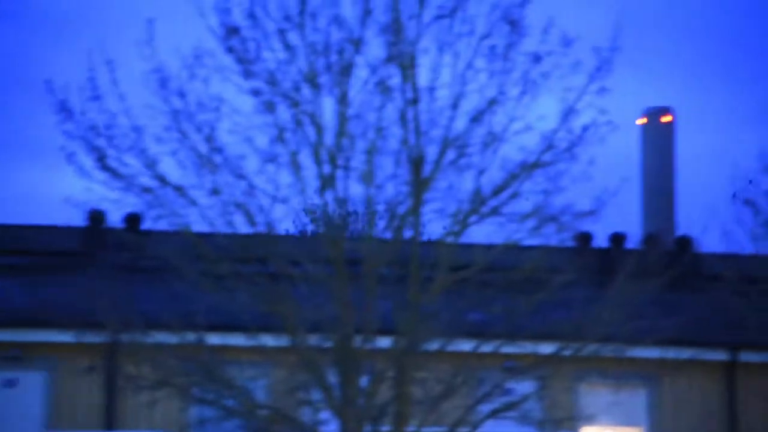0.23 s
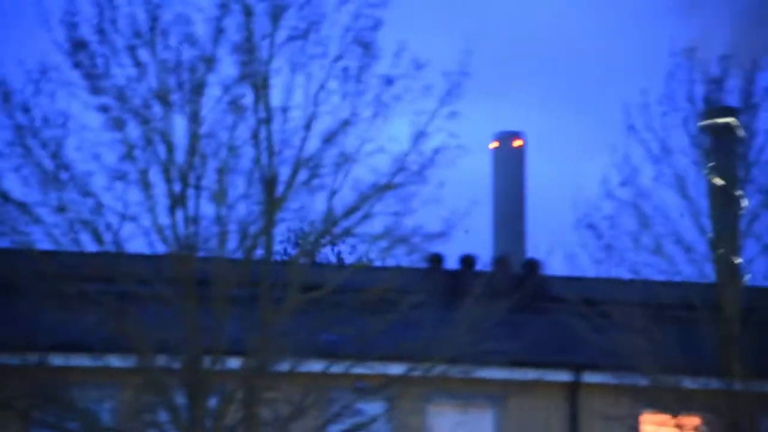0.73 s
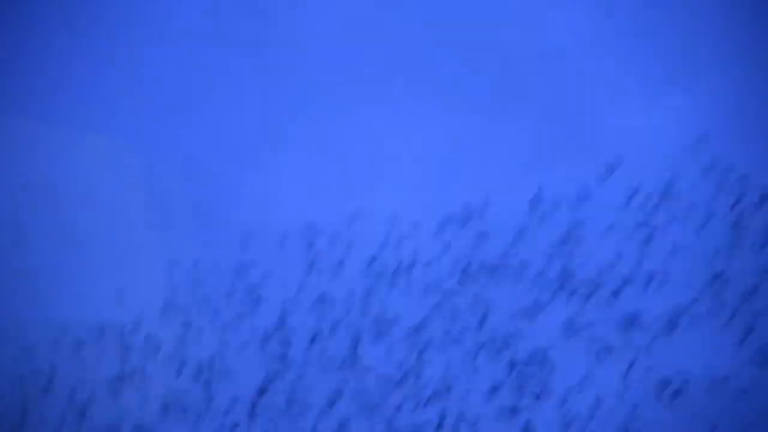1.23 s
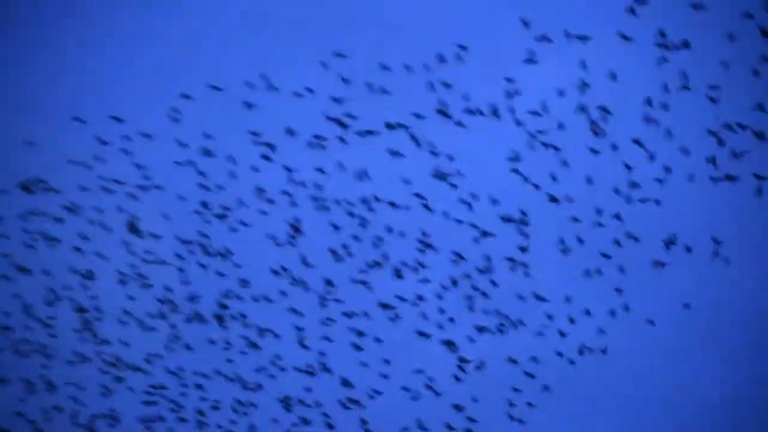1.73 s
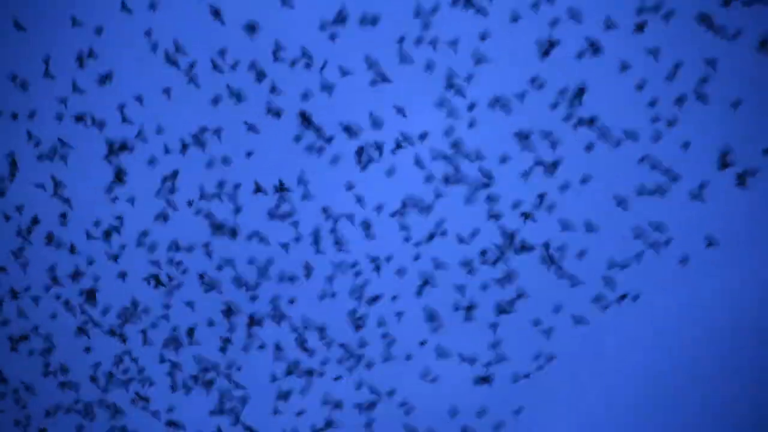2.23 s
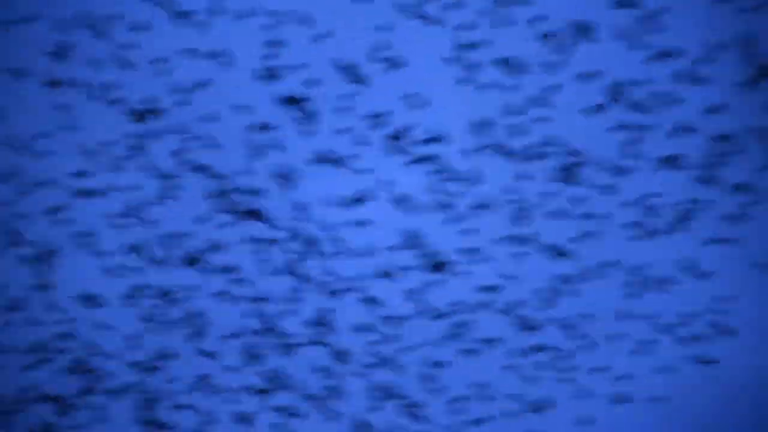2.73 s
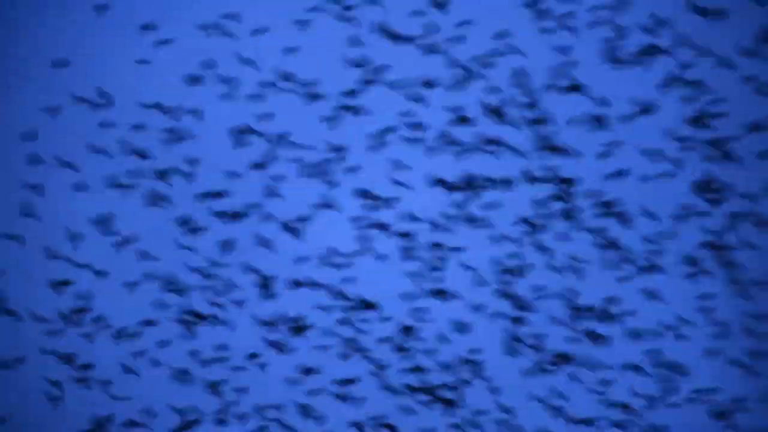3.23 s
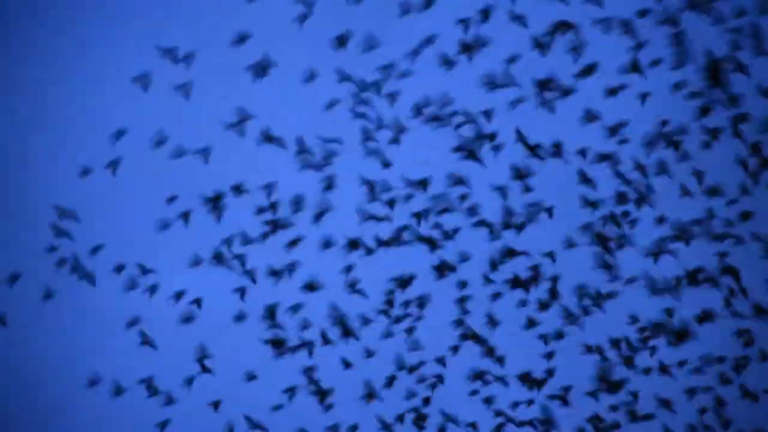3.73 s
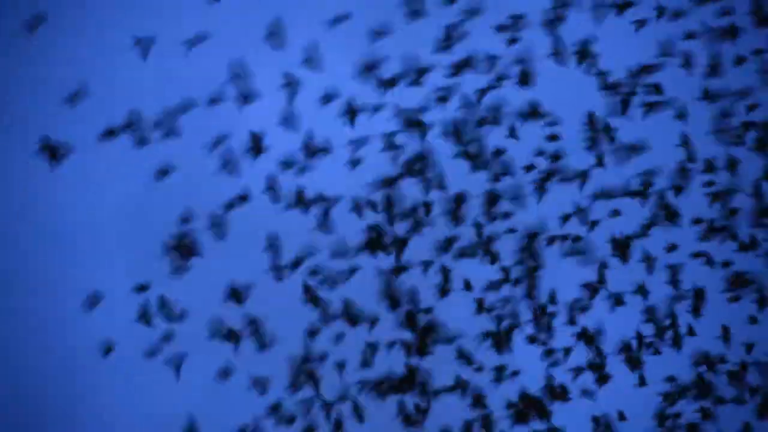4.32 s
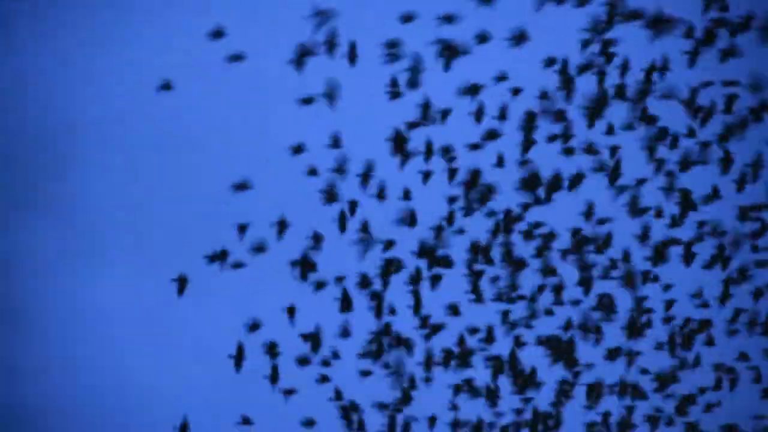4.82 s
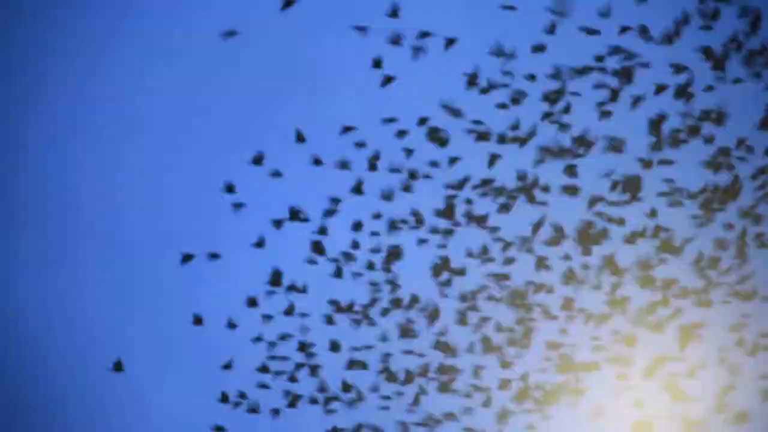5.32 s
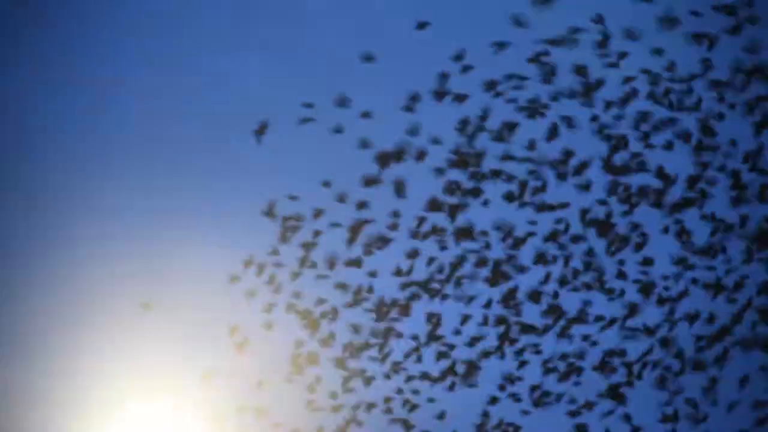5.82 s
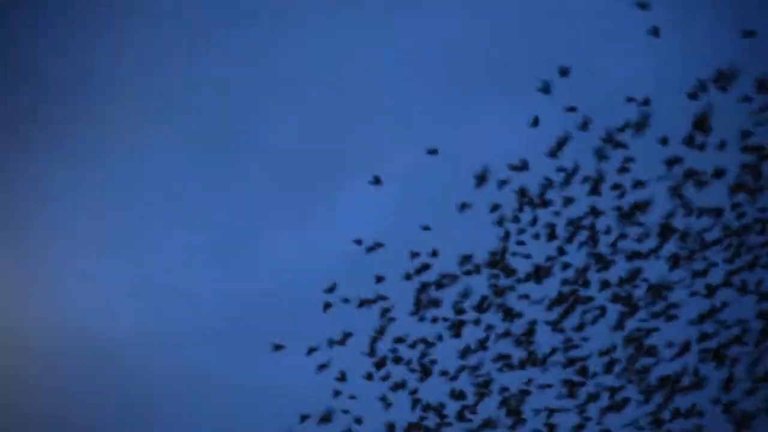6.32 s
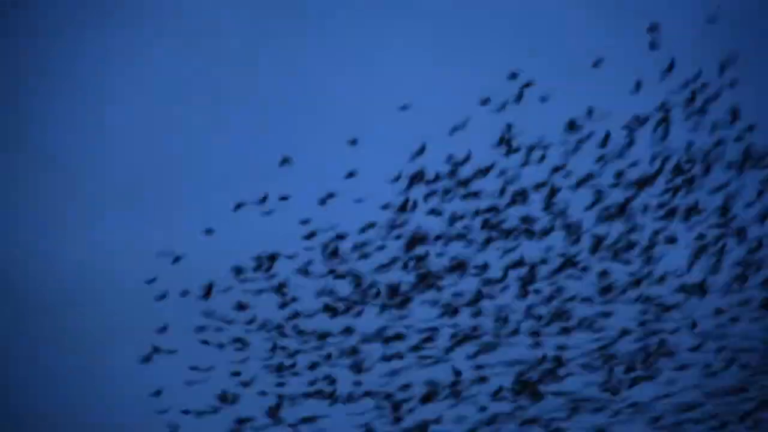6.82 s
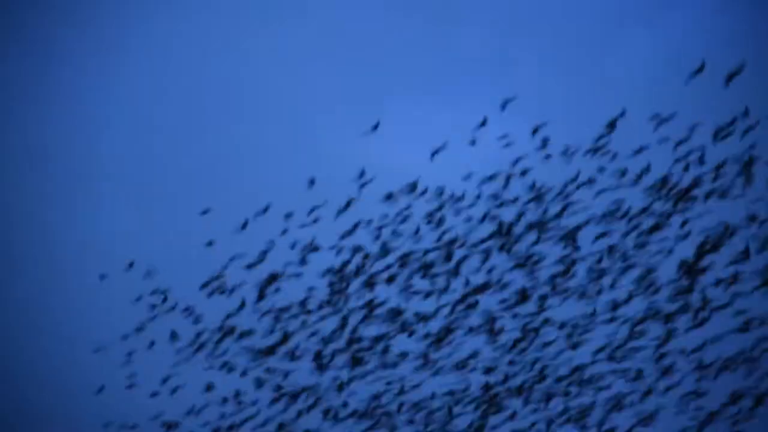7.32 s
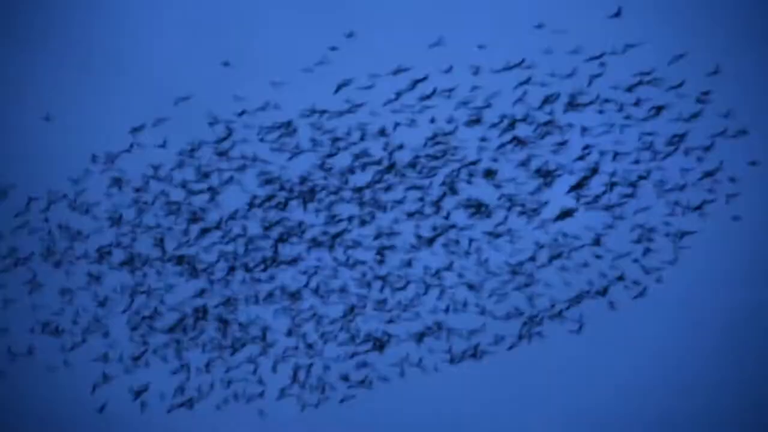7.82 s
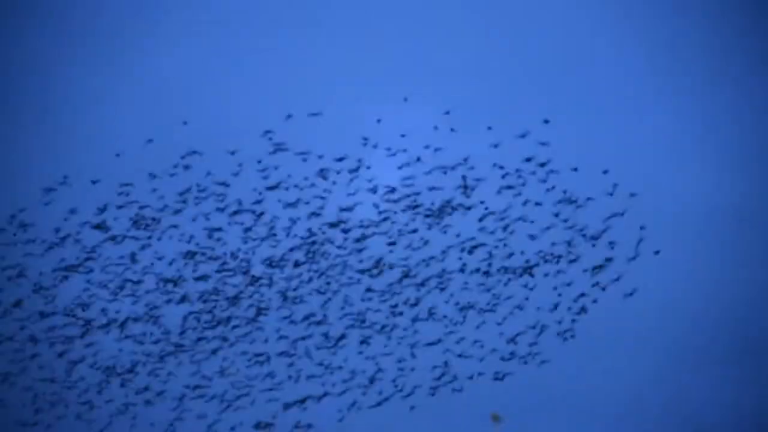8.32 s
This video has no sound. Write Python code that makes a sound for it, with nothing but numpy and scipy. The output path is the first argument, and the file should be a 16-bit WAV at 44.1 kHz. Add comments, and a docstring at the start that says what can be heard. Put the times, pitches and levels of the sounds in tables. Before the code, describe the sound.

A second of traffic noise and crackling wing-like claps, then a wheeling flock of jackdaws chatters in overlapping short 'kya' cries.

```python
"""Jackdaws over the rooftops at dusk

Road noise swells for a second under dry crackling claps, then gives way to a wheeling flock over a town rumble.
Each call is a short falling 'kya': a harmonic stack shaped by beak and throat, strongest on its second partial.
Near birds, rasps and thin squeals stand out from hundreds of farther calls, and scattered echoes from the
houses throw the chatter back. Road and town are coloured noise; claps, knocks and ticks are noise puffs."""
import sys
import numpy as np
from scipy import signal
from scipy.fft import rfft, irfft, next_fast_len
from scipy.io import wavfile
from scipy.ndimage import uniform_filter1d

SR = 44100
rng = np.random.default_rng(int(sys.argv[2]) if len(sys.argv) > 2 else 0)


def generate_wav(signal):
    """Clip the signal to [-1, 1] and save it as 16-bit WAV at the path in sys.argv[1]."""
    frames = np.transpose(np.atleast_2d(signal))
    scaled = np.clip(frames, -1, 1) * 32767
    pcm = np.round(scaled).astype(np.int16)
    wavfile.write(sys.argv[1], SR, pcm)


N = 377055

# The nearest birds. Each row: start in seconds, length in seconds before the beak closes, starting pitch in Hz,
# fall and arch as shares of that pitch, relative level in dB, left-right balance in dB,
# relative strength of the upper partials in dB.
NEAR_CALLS = [(1.141, 0.027, 1440, 0.2, -0.025, -46, -4, -7),
              (1.157, 0.016, 1193, 0.074, -0.019, -52, -3, -11.0),
              (1.172, 0.033, 1320, 0.0007, 0.0078, -58, -2.0, -3),
              (1.193, 0.069, 1238, 0.14, 0.077, -51.5, 0, -4),
              (1.216, 0.049, 1465, 0.17, -0.004, -55, -6, -10),
              (1.227, 0.036, 976, 0.32, 0.025, -52, -3.0, -4),
              (1.319, 0.028, 1370, 0.25, 0, -48.5, -1.5, -6),
              (1.361, 0.017, 1140, 0.19, -0.01, -46, -2, -11),
              (1.405, 0.029, 1181, -0.023, -0.03, -45.5, -3, -7),
              (1.417, 0.035, 1008, 0.012, 0.052, -49, -2, -7),
              (1.53, 0.064, 1166, 0.1, 0.066, -47, -5.0, -7),
              (1.537, 0.063, 1310, 0.13, 0.11, -50, -3.0, -10.0),
              (1.604, 0.014, 1280, 0.14, -0.0088, -47.5, -4.0, -20.0),
              (1.679, 0.014, 1227, -0.0035, 0.02, -55, -2, -10),
              (1.706, 0.041, 1250, 0.43, 0.034, -54, -2, -7),
              (1.772, 0.033, 1292, 0.36, -0.021, -50.5, -3.0, -3),
              (1.782, 0.012, 1260, -0.12, 0.025, -51.5, -4.0, -2),
              (1.814, 0.052, 1515, 0.41, 0.1, -52, -4, -6.0), (1.844, 0.072, 1355, 0.3, 0.1, -51.5, -4, -9),
              (1.862, 0.014, 1200, 0.31, 0, -45, -2, -8), (1.885, 0.022, 1240, 0.16, 0.01, -45, -7, -11),
              (1.921, 0.064, 1102, 0.37, 0.14, -48.5, 0.0, -12.0),
              (2.015, 0.011, 1146, 0.08, -0.02, -49, -3, -2), (2.02, 0.031, 1537, 0.19, 0.02, -51.0, 1, -9),
              (2.097, 0.014, 1206, 0.14, -0.034, -39, -2, -7.5),
              (2.199, 0.065, 1340, 0.38, 0.12, -42, -2.5, -7.5),
              (2.242, 0.032, 1460, 0.35, 0.025, -48, -7, -21),
              (2.283, 0.012, 1146, -0.057, -0.041, -48, -4.0, -19),
              (2.298, 0.049, 1236, 0.26, 0.095, -42.5, -3.5, -7),
              (2.307, 0.051, 1507, 0.41, 0.058, -51, -3.0, -6),
              (2.49, 0.06, 1205, 0.47, 0.052, -49, -3.5, -5),
              (2.524, 0.024, 1427, 0.31, -0.0079, -45, -4, -12),
              (2.596, 0.042, 1290, 0.22, -0.025, -48.5, 4, -13.0),
              (2.631, 0.018, 1374, 0.06, -0.0072, -49, -5.0, -13),
              (2.688, 0.039, 1220, 0.21, -0.02, -43.5, -3.5, -1.5),
              (2.736, 0.03, 1323, 0.49, 0, -48, -6, -12), (2.756, 0.041, 1007, 0.32, -0.025, -52, -1, -5),
              (2.891, 0.026, 1205, 0.3, 0.015, -51, -3.5, -1),
              (2.925, 0.04, 1420, 0.36, 0.08, -48.5, -4, -12),
              (3.001, 0.024, 1378, 0.25, -0.018, -42, -4, -8.5),
              (3.055, 0.062, 1331, 0.39, 0.12, -46, -5.0, -8),
              (3.083, 0.041, 1371, 0.42, 0.05, -51.5, -2.0, -5),
              (3.243, 0.058, 1238, 0.4, 0.023, -48.5, -8, -3),
              (3.255, 0.053, 1331, 0.35, 0.12, -50, -2.5, -2),
              (3.31, 0.028, 1217, 0.32, 0.039, -47.5, -13, -10.0),
              (3.368, 0.024, 1025, 0.16, -0.0057, -48, -5.0, -2),
              (3.376, 0.022, 1243, 0.18, -0.011, -39, -5.0, -14.0),
              (3.404, 0.025, 1300, 0.084, -0.037, -47, -4.0, -17),
              (3.428, 0.055, 1331, 0.026, 0.018, -49.5, -2, -6),
              (3.477, 0.015, 1254, 0.2, 0.038, -43.5, -4.0, -18),
              (3.485, 0.015, 1220, -0.14, -0.0083, -50, -1, -7),
              (3.566, 0.025, 1270, 0.074, 0.0038, -50, -3.5, -4),
              (3.574, 0.036, 1290, 0.41, 0.019, -45, -4.5, -5),
              (3.619, 0.027, 1189, 0.27, -0.0012, -43, -3.5, -3),
              (3.624, 0.011, 1108, 0.18, 0.0, -49, -4.0, -14),
              (3.702, 0.048, 1515, 0.47, 0.08, -40.5, -5.5, -10),
              (3.714, 0.028, 1530, 0.42, 0.025, -56, -7, -9),
              (3.727, 0.02, 982, 0.12, -0.011, -49.5, -9.5, -2),
              (3.755, 0.022, 1185, 0.17, -0.015, -42, -9.5, -5),
              (3.761, 0.064, 1280, 0.3, 0.085, -50, -7.0, -14.0),
              (3.81, 0.022, 1110, 0.27, 0.03, -45, -10, -8),
              (3.83, 0.042, 1447, 0.31, 0.071, -46.5, -8, -9),
              (3.906, 0.018, 1229, 0.12, 0.01, -38, -5, -6),
              (3.925, 0.019, 1279, 0.041, 0.0065, -46, -4, 0), (3.925, 0.03, 1080, 0.23, 0, -49, -6, -5),
              (4.015, 0.024, 1146, 0.24, 0.05, -42, -10, -17),
              (4.037, 0.071, 1399, 0.25, 0.065, -50, -3.5, 1),
              (4.053, 0.068, 1346, 0.45, -0.021, -46.5, -10, -4.0),
              (4.069, 0.011, 1022, 0.25, -0.013, -47, -12, -6),
              (4.077, 0.027, 1261, 0.2, 0, -45.5, -4, -10),
              (4.101, 0.026, 973, -0.0072, 0.0068, -50, -2, -5),
              (4.129, 0.036, 1422, 0.23, 0.0, -46, -2, -5), (4.133, 0.03, 1173, 0.17, 0.0, -42, -10, -6),
              (4.147, 0.036, 1390, 0.17, 0.0091, -47, -1, -8),
              (4.228, 0.034, 1360, 0.42, 0.029, -44, -11, -9.0),
              (4.258, 0.018, 1280, 0.4, 0.03, -43.5, -4, -13),
              (4.286, 0.029, 1213, 0.29, 0.05, -44, -10, -17),
              (4.319, 0.016, 1318, 0.084, 0.0056, -50, -7, -7),
              (4.35, 0.053, 1280, 0.41, 0.13, -42.5, -8, -14),
              (4.364, 0.034, 995, 0.14, 0.068, -43, -9, -24),
              (4.368, 0.033, 1320, 0.27, 0.011, -51, -11, -15.0),
              (4.416, 0.028, 978, 0.093, 0.0, -54, -6.0, -4.0),
              (4.43, 0.036, 1470, 0.38, 0.05, -49.5, -5.0, 0), (4.5, 0.017, 1390, 0.19, 0.029, -46, -7, -9),
              (4.521, 0.041, 1356, 0.47, -0.042, -49.5, -5.5, -2),
              (4.56, 0.056, 1315, 0.47, 0.057, -46.5, -3.5, -2.5),
              (4.59, 0.038, 1167, 0.29, 0.0088, -47, -7, -17.0),
              (4.629, 0.027, 1154, 0.076, -0.018, -46.5, -7.0, -14.0),
              (4.712, 0.03, 1250, 0.17, 0.04, -44, -3, -11), (4.739, 0.034, 992, 0.16, 0.014, -51, -2, 1.0),
              (4.748, 0.035, 1150, 0.087, -0.02, -46, -7, -16),
              (4.775, 0.056, 1017, 0.11, -0.025, -51, -7, -3.0),
              (4.803, 0.044, 1530, 0.45, 0.1, -42.5, -5, -5.5),
              (4.817, 0.036, 1554, 0.55, 0.069, -57, 1, -3),
              (4.857, 0.033, 963, 0.24, -0.02, -49.5, -5.0, -8),
              (4.895, 0.015, 1494, 0.14, 0.02, -51, -1, -16),
              (4.913, 0.043, 1247, 0.045, 0.0099, -45.5, -2.0, -9.5),
              (4.969, 0.025, 1074, 0.03, 0.032, -51, -2.0, -3),
              (5.068, 0.024, 1155, -0.04, 0.058, -48, -7, -9),
              (5.11, 0.028, 1420, 0.16, 0.01, -46, -4.5, -7),
              (5.13, 0.021, 1210, 0.22, 0.025, -42.5, -8, -9),
              (5.218, 0.039, 1241, 0.076, -0.03, -47.5, -3, -9),
              (5.226, 0.023, 992, 0.13, -0.033, -47, 0, -9.0),
              (5.262, 0.012, 1250, 0.045, 0.0069, -48.5, -4.0, -16),
              (5.292, 0.052, 1240, 0.21, 0.048, -43.5, -1, -4),
              (5.36, 0.056, 1246, 0.29, -0.0079, -45.5, -8, -12),
              (5.368, 0.063, 1299, 0.32, 0.08, -44.5, -2.5, -8.5),
              (5.411, 0.0156, 1310, 0.14, 0.022, -51.5, -9, -16),
              (5.428, 0.014, 1113, 0.062, -0.018, -48, -12, -12.0),
              (5.515, 0.035, 1279, 0.19, 0.025, -52.5, -9, -16),
              (5.553, 0.023, 1490, 0.35, 0.045, -50, -6, -10),
              (5.619, 0.02, 1053, 0.11, 0.025, -50.5, -9, -4.0),
              (5.682, 0.058, 1453, 0.37, -0.031, -47.5, -5.5, -5.5),
              (5.693, 0.018, 1441, 0.14, 0.0, -49.5, -9.0, -6),
              (5.705, 0.013, 1028, 0.12, -0.025, -50, -6.0, -11),
              (5.751, 0.022, 968, 0.15, -0.016, -52.5, -10, -6),
              (5.797, 0.028, 1207, 0.17, 0.024, -57, -13, -2),
              (5.905, 0.035, 1476, 0.27, 0.035, -51, -6, -15),
              (5.923, 0.028, 1182, 0.34, -0.032, -48.0, -7.0, -11),
              (5.972, 0.035, 1210, 0.074, 0.01, -49, -7, -13),
              (6.016, 0.018, 997, 0.18, -0.034, -45.5, -6, -11.0),
              (6.035, 0.03, 1010, 0.28, 0, -54, -1, -9), (6.042, 0.027, 1237, 0.23, 0.025, -46, -3.0, -9),
              (6.062, 0.03, 1185, 0.049, 0.086, -48.0, -9, -13),
              (6.066, 0.022, 1118, 0.31, -0.033, -48, -6, -8),
              (6.084, 0.028, 1124, 0.3, -0.025, -48, -8, -17),
              (6.116, 0.051, 1190, 0.39, 0.042, -49.5, -3.5, -9),
              (6.158, 0.054, 1144, 0.21, -0.025, -48.5, -5, -10.0),
              (6.256, 0.032, 1163, 0.31, 0.0, -53.5, -3, -3),
              (6.305, 0.062, 1173, 0.022, 0.082, -46, -5.5, -10.5),
              (6.435, 0.055, 1010, 0.28, 0.12, -52, -5.0, -5),
              (6.539, 0.021, 1253, 0.25, 0.017, -50, -3, -6),
              (6.621, 0.034, 1187, 0.14, 0.071, -49, -3, -12.0),
              (6.669, 0.044, 1164, 0.095, 0.13, -51, -3, -8),
              (6.685, 0.051, 1172, 0.34, 0.091, -52, -3, -7),
              (6.731, 0.043, 970, 0.055, 0.015, -58, -3, -5),
              (6.815, 0.019, 1190, 0.11, 0.0087, -56, -3, -1),
              (6.898, 0.074, 1030, 0.15, -0.0081, -55.5, -2, -10),
              (7.03, 0.016, 1230, 0.1, 0, -58, -4, -14), (7.064, 0.023, 1256, 0.16, 0, -50, -6, -14),
              (7.115, 0.019, 1030, 0.2, 0.02, -47, -7, -18),
              (7.17, 0.039, 1217, 0.36, 0.025, -56, -4.0, -11),
              (7.197, 0.05, 1410, 0.46, 0.017, -51, -3.0, -14),
              (7.252, 0.029, 1232, 0.36, 0.056, -51.5, -4.0, -11),
              (7.31, 0.016, 1250, 0.19, 0.0066, -48, -6.0, -17),
              (7.373, 0.049, 1305, 0.36, -0.016, -54.0, -3.0, -16),
              (7.441, 0.057, 1044, 0.24, 0.084, -50.5, -4.5, -9),
              (7.541, 0.022, 1200, 0.063, 0.0, -55.5, -4, -15.0), (7.584, 0.022, 1220, 0.2, 0, -52, -6, -9),
              (7.653, 0.028, 1125, 0.36, 0.016, -48, -6, -6),
              (7.657, 0.068, 1232, 0.28, 0.05, -48, -5.0, -9),
              (7.724, 0.015, 1163, 0.03, 0.0045, -47.5, -5, -7),
              (7.822, 0.05, 1230, 0.23, 0.02, -51, -5, -10),
              (7.922, 0.02, 1130, 0.17, -0.0048, -50.5, -8, -15),
              (7.954, 0.031, 1117, -0.015, 0.05, -53.5, -4, -9),
              (7.992, 0.053, 1048, -0.1, 0.022, -48, -6.0, -15),
              (8.206, 0.028, 1170, 0.39, 0, -56, -7, -19),
              (8.219, 0.043, 970, 0.15, -0.016, -53.5, -4.0, -23),
              (8.289, 0.036, 1205, 0.27, 0.08, -50.5, -7.0, -12),
              (8.324, 0.02, 1052, 0.14, 0.01, -49.5, 0, -10), (8.36, 0.038, 1177, 0.29, 0.03, -54, -3, -11),
              (8.375, 0.018, 1254, 0.097, 0.014, -57, -5.0, -10.0),
              (8.45, 0.05, 1223, 0.34, 0, -57, -2, -18)]
# Harsh, rasping calls. Each row: start in seconds, length in seconds, relative level in dB, left-right in dB.
RASPING_CALLS = [(1.882, 0.026, -45, -2), (2.892, 0.03, -48, -1), (3.923, 0.041, -46.5, -1),
                 (4.451, 0.033, -48, 0), (5.922, 0.027, -46.5, -8), (6.076, 0.04, -54, -3),
                 (6.442, 0.034, -48, -2.5), (7.651, 0.043, -46, 3), (8.225, 0.045, -58.5, -3)]
# Thin squeals among the caws. Each row: start in seconds, length in seconds, starting pitch in Hz, level in dB.
SQUEAL_CALLS = [(2.521, 0.034, 4220, -51.5), (2.78, .035, 3430, -51), (3.045, 0.041, 4060, -57),
                (4.034, 0.097, 4270, -55), (7.087, 0.013, 3770, -54.5), (7.297, 0.027, 3840, -60),
                (8.043, 0.04, 4100, -58)]
# Volleys of the birds behind. Each row: start in seconds, length in seconds, relative level in dB.
FLOCK_VOLLEYS = [(1.148, 0.11, -40.5), (1.401, 0.031, -36.5), (1.507, 0.041, -32.5), (1.805, 0.15, -36.5),
                 (2.013, 0.071, -41.5), (2.232, 0.15, -45.5), (2.62, 0.18, -42.5), (2.893, 0.19, -42.5),
                 (3.232, 0.25, -42), (3.566, 1.44, -41), (5.23, 0.2, -43), (5.905, 0.29, -43),
                 (7.075, 0.76, -45.5), (7.62, 0.12, -37.5), (7.813, 0.34, -47.5), (8.23, 0.17, -41.5)]
# The flock draws near and wheels away. Each row: time in seconds, relative upper partials of its calls in dB,
# level of its farthest part in dB, town rumble in dB, relative level of the calling between volleys in dB.
FLOCK_APPROACH = [(1.15, -4, -53.5, -53.5, -71), (2.8, 0.5, -56, -52, -65), (4.2, 5, -47, -50.5, -47),
                  (5.4, 1.5, -56, -51, -47), (6.7, 4, -51.5, -52.5, -64), (8.55, -29, -56, -51, -76)]
# Colouring by throat and open beak. Each row: frequency in Hz, relative gain in dB.
THROAT_GAIN = [(500, -42), (900, -10.5), (1200, -12.5), (1480, -4), (1950, 0), (2450, 0.5), (2700, -2.5),
               (3050, -11), (3900, -14.5), (5000, -16), (7000, -16), (8300, -10.5), (10500, -25),
               (14000, -30)]
# Spectrum of far traffic and faint hiss. Each row: frequency in Hz, relative density in dB per Hz.
TOWN_SPECTRUM = [(15, -1.5), (30, -4.5), (90, 1.5), (160, 2), (280, -5.5), (430, -8.5), (800, -8.5),
                 (1150, -9.5), (1600, -7), (3400, -19), (5200, -25), (7000, -25), (8800, -24.5),
                 (14000, -40.5)]
# Spectrum of the nearer road. Each row: frequency in Hz, relative density in dB per Hz.
ROAD_SPECTRUM = [(20, -15), (65, -6), (170, -6), (240, 0), (330, -9), (620, -8), (1250, 2), (2200, -10.5),
                 (3100, -13.5), (3900, -23.5), (5200, -16.5), (7000, -25.5), (8600, -19.5), (14000, -43)]
# Swell of the tyre roar. Each row: time in seconds, level in dB.
TYRE_SWELL = [(0, -49.5), (.3, -48.5), (.6, -46.5), (.8, -46.5), (1.0, -45), (1.14, -44.5)]
# Likeness of the two channels in diffuse sound. Each row: frequency in Hz, likeness from 0 to 1.
CHANNEL_LIKENESS = [(150, 1), (260, 1), (500, 0.99), (1100, 0.64), (2200, 0), (5000, 0.55), (10000, 0.12)]
# Dry crackling claps, probably wings, over the roar. Each row: start in seconds, peak in dB, centre in Hz,
# decay time in seconds, left-right balance in dB.
DRY_CLAPS = [(.157, -36, 1460, 0.0062, -12), (.847, -37.5, 1490, 0.0061, -3), (.902, -37, 1410, 0.0025, -4),
             (.91, -35, 940, .005, -5), (.962, -33.5, 1070, .005, -3), (1.004, -30.5, 1260, 0.0022, -2),
             (1.057, -32.5, 1380, 0.0017, -3), (1.11, -35, 1090, 0.0057, -4),
             (1.069, -37, 1260, 0.0094, -5), (1.083, -38.5, 1560, 0.002, -3)]
# Soft knocks. Each row: start in seconds, peak in dB, centre in Hz, decay time in seconds, left-right in dB.
SOFT_KNOCKS = [(2.242, -39, 790, 0.007, 9), (3.69, -38.5, 770, 0.011, 5), (4.107, -41.5, 870, 0.0074, 4)]
# Sharp ticks. Each row: start in seconds, peak in dB, centre in Hz, decay time in seconds, left-right in dB.
SHARP_TICKS = [(1.8596, -33, 9050, 0.001, 21), (2.693, -48, 9100, 0.0042, -6), (3.002, -47, 9500, .001, 6),
               (7.002, -54, 8500, 0.00091, 2), (7.6742, -42, 8550, 0.00086, 10)]

TIME = np.arange(N) / SR
HANDOVER_S = 1.145  # the road gives way to the flock
EDGE_HZ = 14800
VOLLEY_RISE_S, VOLLEY_FADE_S = 0.0097, 0.024
# As the beak closes the voice slides on down (share of the pitch per second) and fades.
TAIL_S, TAIL_FALL_PER_S, TAIL_DB_PER_S = 0.036, 6.5, 698
BEAK_LOW_HZ, BEAK_SPAN_HZ = 4160, 1840  # each bird's open beak resonates somewhere in this range
UPPER_PARTIALS = np.arange(3, 11)[:, None]


def near_birds(level_db=3, upper_lift_db=1.64, fundamental_db=1.5, steep_loss_db=10, rough=0.2, typical_db=-48):
    """Calls that stand out: louder ones are clearer, and a steeper fall has a weaker fundamental."""
    out = np.zeros((2, N))
    for s, length, start, fall, arch, db, pan_db, upper_db in NEAR_CALLS:
        chance = rng.standard_normal((2, SR // 4))
        middle = start * (1 - fall / 2 + arch)
        end = start * (1 - fall)
        beak_hz = BEAK_LOW_HZ + BEAK_SPAN_HZ * rng.random()
        roughness = rough * amp((typical_db - db) / 2)
        call = kya(length, (start, middle, end), upper_db + upper_lift_db, beak_hz, pan_db, chance, roughness,
                   fade_db=1.5, fundamental_db=fundamental_db - steep_loss_db * fall)
        # offset the throat's gain at the second partial, so it does not change the balance between calls
        add(out, s, amp(db + level_db - read(THROAT_GAIN, 2 * middle)) * call)
    return coloured(out, THROAT_GAIN)


def kya(length, pitches, upper_db, beak_hz, pan_db, chance, rough, fade_db=3, fundamental_db=3,
        beak_db=9, beak_width_hz=650, ground=0.28, overhang=0.002014, release=0.0083, lag_per_pan=9e-6,
        dulling=0.17, closing_db=7, jitter=0.031, grain=0.72, upper_grain=1.47, grain_hz=750,
        muffling_db_per_s=500, opening_db=3.0, swell_db=1.5, bend=.011, flutter=.3, upper_flutter=0.79,
        flutter_hz=110):
    """One call before the throat: partials on a falling arch of pitch, swelling as they cross the beak resonance."""
    t = np.arange(-overhang, length + TAIL_S, 1 / SR)
    u = np.minimum(t / length, 1)
    past = np.maximum(t - length, 0)
    gape = np.sin(np.pi * np.maximum(u, 0)) - .5

    start, middle, end = pitches
    arch = (2 * middle - start - end) * 2 * u * (1 - u)
    hz = (start + (end - start) * u + arch) * np.exp(-TAIL_FALL_PER_S * past)
    hz = hz * (1 + bend * np.sin(2 * np.pi * (t * 45 + chance[0, -1])))  # the glide is never quite smooth
    waver, shimmer = evened(uniform_filter1d(chance[:, :len(t)], size=50, axis=1))
    hoarse = rough * np.clip(.4 + u, 0, 1.4)  # the voice starts clear and frays as it falls
    turns = np.cumsum(hz * (1 + jitter * hoarse * waver)) / SR
    lag = lag_per_pan * pan_db * np.array([[.5], [-.5]])  # the louder side also hears it first
    first = np.exp(2j * np.pi * (turns + hz * lag)).astype(np.complex64)

    beak = 1 + amp(beak_db) / (1 + ((UPPER_PARTIALS * hz - beak_hz) / beak_width_hz) ** 2)
    gains = beak * amp(2.0 * chance[0, :len(UPPER_PARTIALS), None])  # every voice has its own balance
    gains = gains * amp(dulling * upper_db * UPPER_PARTIALS)  # dull voices lose their highest partials first
    # the upper partials ring most in mid-call, with the beak wide
    open_beak = amp(opening_db * gape - muffling_db_per_s * past)

    partial = first * first
    fundamental = first * amp(fundamental_db - 5.1 * u)  # it sinks as the beak opens
    second = partial * frayed(t, grain * hoarse, grain_hz) * frayed(t, flutter, flutter_hz)
    voice = fundamental + second
    for gain in amp(upper_db) * evened(gains) * open_beak:
        partial = partial * first
        patches = frayed(t, upper_flutter, flutter_hz)  # each upper partial comes and goes on its own
        strength = gain * patches * frayed(t, upper_grain * hoarse, grain_hz)
        voice = voice + strength.astype(np.complex64) * partial

    attack = np.clip((t - t[0]) / .003, 0, 1)
    tail = amp(-closing_db * np.minimum(past / release, 1) - TAIL_DB_PER_S * past)
    ending = np.clip((t[-1] - t) / release, 0, 1)
    shape = attack * tail * ending * amp(swell_db * gape - fade_db * u)
    direct = voice.real * shape * amp(2.5 * hoarse * shimmer) * sides(pan_db)
    late = int(SR * .002 * (1 + 2 * abs(chance[1, 0])))  # the ground echo beats against the glide
    return np.pad(direct, [(0, 0), (0, late)]) + ground * np.pad(direct, [(0, 0), (late, 0)])


def frayed(t, share, rate_hz, size=200):
    """Random flutter of one partial's strength and phase: it widens a clean line into a band."""
    knots = rng.standard_normal((size, 2)) @ [1, 1j]
    wander = np.interp((t - t[0]) * rate_hz, np.arange(size), knots)
    return (1 + share * wander) / np.sqrt(1 + share ** 2)


def rasps(pitch_hz=1170, upper_db=-1, beak_hz=5200):
    """Scolding calls so rough that their partials run together."""
    out = np.zeros((2, N))
    pitches = pitch_hz * np.array([1, .93, .8])
    for s, length, db, pan_db in RASPING_CALLS:
        chance = rng.standard_normal((2, SR // 4))
        call = kya(length, pitches, upper_db, beak_hz, pan_db, chance, rough=1, jitter=.13)
        add(out, s, amp(db) * call)
    return coloured(out, THROAT_GAIN)


def squeals(fall_per_s=1.97, jitter=0.025, shimmer_db=2, pan_db=-3.5):
    """Thin high cries: one sliding, slightly unsteady tone that swells and fades."""
    out = np.zeros((2, N))
    for s, length, hz, db in SQUEAL_CALLS:
        t = np.arange(0, length, 1 / SR)
        chance = rng.standard_normal((2, SR // 4))[:, :len(t)]
        waver, shimmer = evened(uniform_filter1d(chance, size=50, axis=1))
        turns = np.cumsum(hz * np.exp(-fall_per_s * t) * (1 + jitter * waver)) / SR
        shape = np.sqrt(np.sin(np.pi * t / length)) * amp(db + shimmer_db * shimmer)
        add(out, s, np.sqrt(2) * np.sin(2 * np.pi * turns) * shape * sides(pan_db))
    return out


def flock(count=270, spread_db=2.0, level_db=-12, bright_spread_db=3):
    """Birds at middle distance call at random, each from its own place, swelling together in volleys."""
    out = np.zeros((2, N))
    s, upper_db = np.transpose(FLOCK_APPROACH)[:2]
    draws = np.clip(rng.standard_normal((count, 4)), -2, 2)
    for k, (when, near, side, bright) in enumerate(draws):
        at = HANDOVER_S + (k + abs(when)) / count * (N / SR - HANDOVER_S)
        brightness_db = np.interp(at, s, upper_db) + bright_spread_db * bright
        call = stranger(brightness_db, -4.6 + 6 * side, pitch_hz=1214.0, spread=.11, rough=.33, steep=.38)
        add(out, at, amp(spread_db * near) * call)
    return evened(coloured(out, THROAT_GAIN)) * excitement() * amp(level_db)


def stranger(upper_db, pan_db, pitch_hz, spread, rough, steep):
    """The call of any one bird: its own pitch, length, fall and beak."""
    chance = rng.standard_normal((2, SR // 6))
    long, fall, arch, beak = rng.random(4)
    start = pitch_hz * np.exp(spread * np.clip(chance[1, 1], -2, 2))
    drop = 0.0599 + steep * fall
    pitches = start * (1 - drop * np.array([0, .5 * arch - .08, 1]))
    length = .015 + .028 * long
    beak_hz = BEAK_LOW_HZ + BEAK_SPAN_HZ * beak
    return kya(length, pitches, upper_db, beak_hz, pan_db, chance, rough, fade_db=-14.5)


def excitement():
    """How hard the flock calls: each volley flares up, holds and dies back into the calling between volleys."""
    s, _, _, _, between_db = np.transpose(FLOCK_APPROACH)
    power = amp(np.interp(TIME, s, between_db)) ** 2
    for start, length, db in FLOCK_VOLLEYS:
        rise = np.clip((TIME - start) / VOLLEY_RISE_S + 1, 0, 1)
        fade = np.exp(-np.clip(TIME - start - length, 0, 1) / VOLLEY_FADE_S)
        power = power + (amp(db) * rise * fade) ** 2
    return np.sqrt(power)


def far_chatter(count=32, fundamental_db=9.5):
    """The farthest birds, blurred by echoes into a dull babble: each voice repeats at random, louder or softer."""
    out = np.zeros((2, N))
    for _ in range(count):
        call = stranger(-6.0, 0, pitch_hz=1242.6, spread=.085, rough=0.28, steep=0.34)[0]
        for at, size, side in rng.random((20, 3)):
            one_side = np.eye(2)[int(2 * side), :, None]
            add(out, at * N / SR, size * call * one_side)
    blurred = coloured(houses(out, t60=0.13, treble_t60=0.13), THROAT_GAIN)
    dull = coloured(blurred, [(950, 0), (1170, fundamental_db), (1450, 0)])  # lift around the fundamental
    s, _, level_db, _, _ = np.transpose(FLOCK_APPROACH)
    entry = np.clip((TIME - HANDOVER_S) / 0.017, 0, 1)
    return evened(dull) * amp(np.interp(TIME, s, level_db)) * sides(-5.5) * entry


def houses(x, t60=0.16, treble_t60=0.15, gap=0.0087):
    """Scattered echoes from walls, roofs and trees, with one decay for the treble and one below it."""
    t = np.arange(SR) / SR
    strengths = rng.standard_normal((2, SR))
    taps = strengths * (rng.random((2, SR)) < 1500 / SR) * (t > gap)  # about 1500 echoes per second
    low = signal.sosfilt(signal.butter(2, 3500, fs=SR, output="sos"), taps)
    tail = diffuse(low * amp(-60 * t / t60) + (taps - low) * amp(-60 * t / treble_t60))
    tail = tail / np.linalg.norm(tail[0])
    return signal.fftconvolve(x.mean(0)[None], tail, axes=1)[:, :N] * sides(0.86)


def bursts(rows, width):
    """Brief puffs of decaying noise, passed twice through a resonance whose width is a share of its centre."""
    out = np.zeros((2, N))
    t = np.arange(SR // 10) / SR
    for s, db, hz, decay, pan_db in rows:
        b, a = signal.iirpeak(hz, 1 / width, fs=SR)
        push = rng.standard_normal(len(t)) * np.exp(-t / decay)
        puff = signal.lfilter(b, a, signal.lfilter(b, a, push))
        add(out, s, amp(db) * puff / abs(puff).max() * sides(pan_db))
    return out


def background(grit_db=1.1, lag=6):
    """Coloured noise: engine hum and tyre roar with a gritty flutter, then the low rumble of the town."""
    s, _, _, town_db, _ = np.transpose(FLOCK_APPROACH)
    town = evened(coloured(diffuse(rng.standard_normal((2, N))), TOWN_SPECTRUM))
    town = town * amp(np.interp(TIME, s, town_db))
    road = evened(coloured(diffuse(rng.standard_normal((2, N))), ROAD_SPECTRUM))
    hum = coloured(road, [(300, 1.5), (600, -5), (1200, -56)])  # engines stay level while the tyres draw near
    left, right = road - hum
    tyres = np.array([np.roll(left, lag), right]) * sides(-3.5)  # the road lies to the right; lag in samples
    grit = evened(uniform_filter1d(rng.standard_normal(N), size=300))
    swell = amp(np.interp(TIME, *np.transpose(TYRE_SWELL)) + grit_db * grit)
    road = hum * amp(-44.0) + tyres * swell
    after = np.clip((TIME - HANDOVER_S) / 0.01 + .5, 0, 1)  # 10 ms equal-power crossfade
    return road * np.sqrt(1 - after) + town * np.sqrt(after)


def diffuse(pair):
    """Blends two unrelated signals into stereo: alike in the bass, less alike above it."""
    size = next_fast_len(pair.shape[1])
    a, b = rfft(pair, size)
    same = np.clip(read(CHANNEL_LIKENESS, np.fft.rfftfreq(size, 1 / SR)), 0, 1)
    mid = a * np.sqrt((1 + same) / 2)
    side = b * np.sqrt((1 - same) / 2)
    return irfft(np.array([mid + side, mid - side]), size)[:, :pair.shape[1]]


def coloured(x, points):
    """Filters by a spectrum in dB."""
    size = next_fast_len(N + 2000)
    gain = amp(read(points, np.fft.rfftfreq(size, 1 / SR)))
    return irfft(rfft(x, size) * gain, size)[..., :N]


def read(points, hz):
    """Reads a spectrum on a log-frequency axis."""
    f, value = np.transpose(points)
    return np.interp(np.log(hz + 1), np.log(f), value)


def amp(db):
    """Decibels to gain."""
    return 10 ** (np.asarray(db) / 20)


def evened(x):
    """Scales to rms 1."""
    return x / np.sqrt(np.mean(x ** 2) + 1e-20)


def sides(pan_db):
    """Left and right gains whose mean is 1; positive leans left."""
    gains = amp([[pan_db / 2], [-pan_db / 2]])
    return gains / gains.mean()


def add(mix, s, sound):
    """Mixes a stereo sound in at a time in seconds."""
    part = mix[:, max(round(s * SR), 0):][:, :sound.shape[1]]
    part += sound[:, :part.shape[1]]


def scene():
    """Birds and their echoes over the town; the farther birds arrive more by way of the houses."""
    near = near_birds() + rasps() + squeals()
    middle = flock()
    birds = near + middle + far_chatter() + houses(amp(-11.0) * near + .8 * middle)
    claps = bursts(DRY_CLAPS, width=0.9)
    knocks = bursts(SOFT_KNOCKS, width=0.45) + bursts(SHARP_TICKS, width=0.59)
    return birds + background() + claps + knocks


def record(dry):
    """The band limit: a steep low-pass takes off the top of the treble."""
    lowpass = signal.firwin(255, EDGE_HZ, window=("kaiser", 9), fs=SR)
    return signal.oaconvolve(dry, lowpass[None], "same")


dry = scene()
out = record(dry)
generate_wav(out)
```